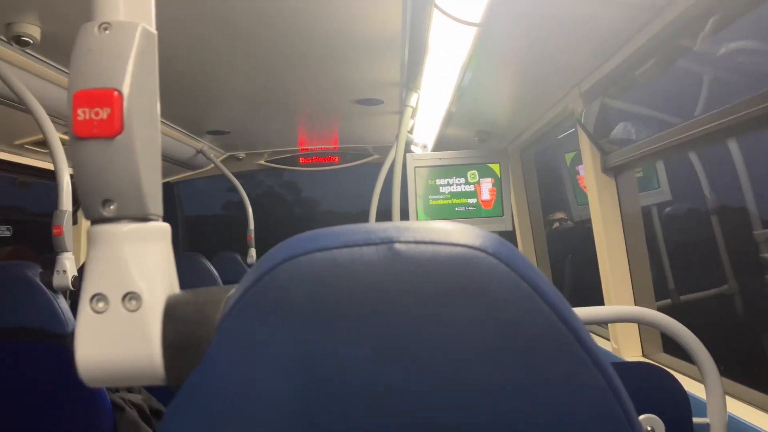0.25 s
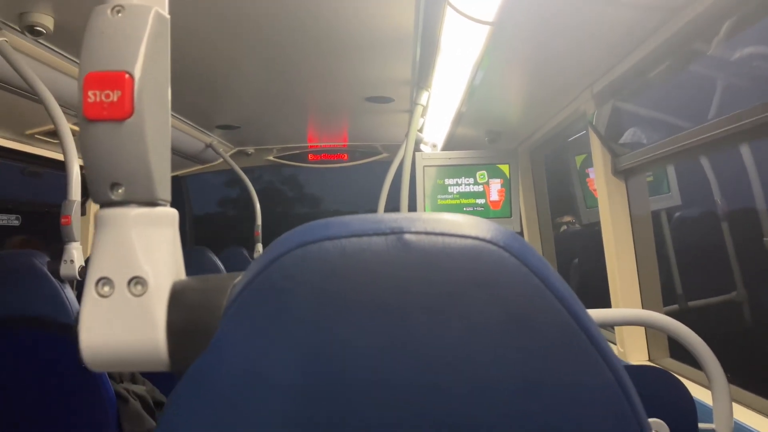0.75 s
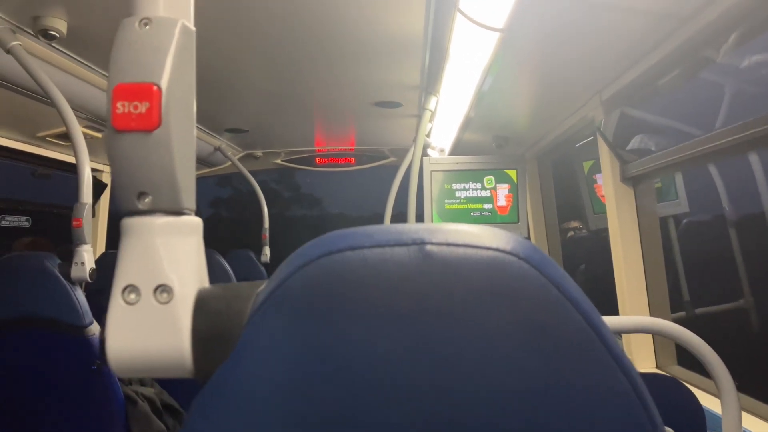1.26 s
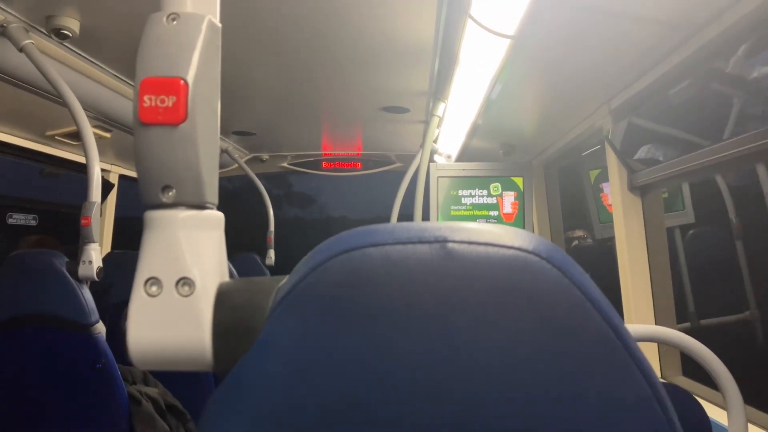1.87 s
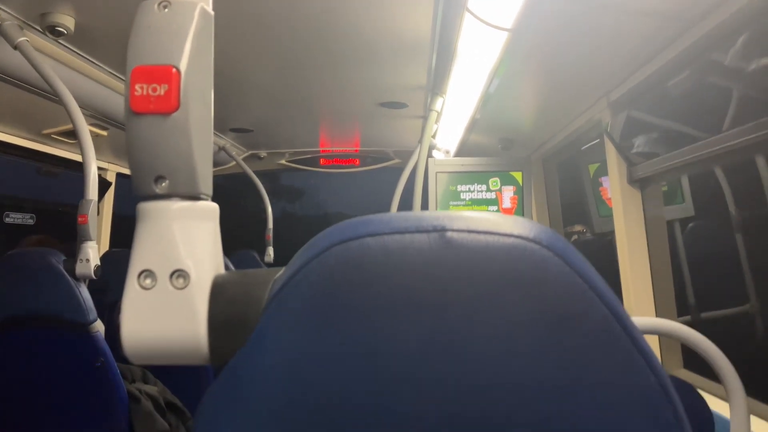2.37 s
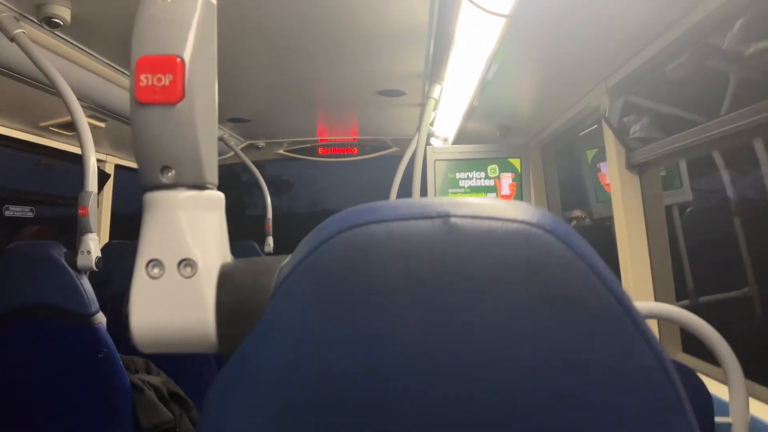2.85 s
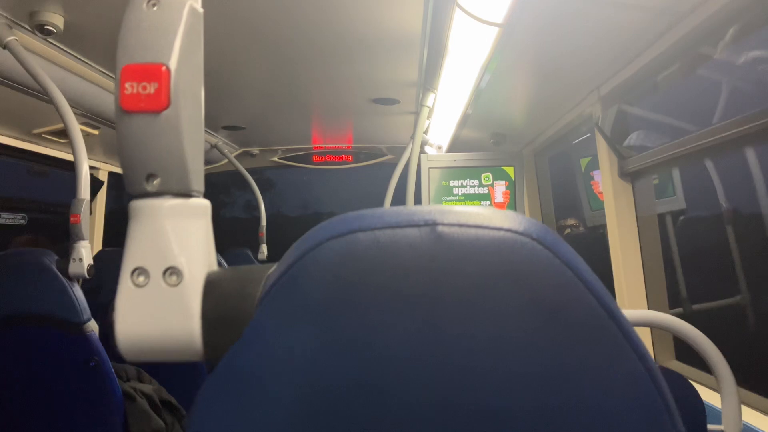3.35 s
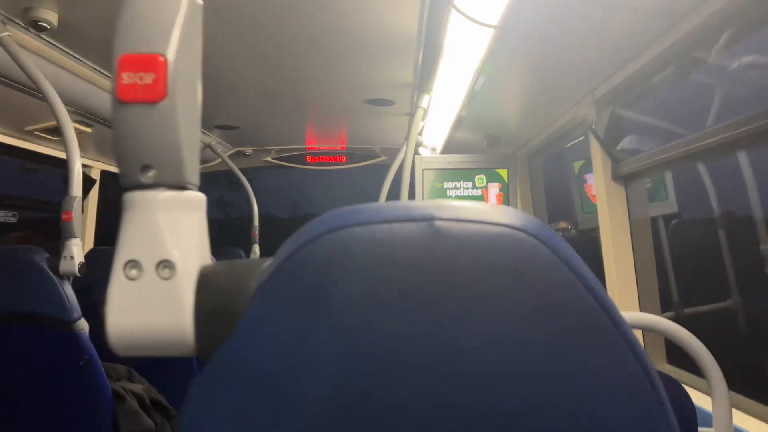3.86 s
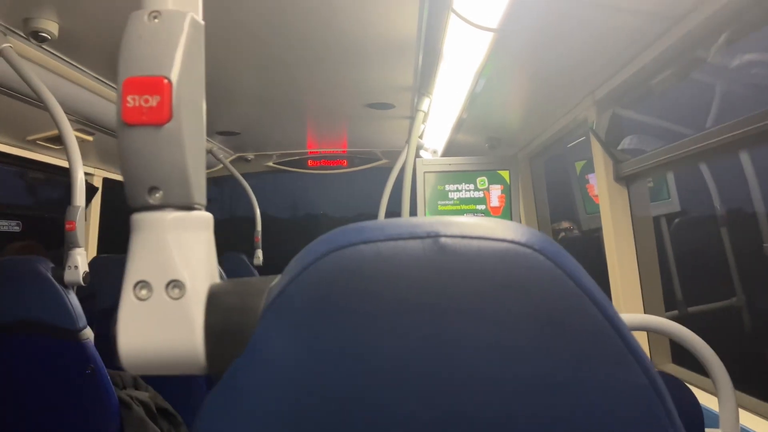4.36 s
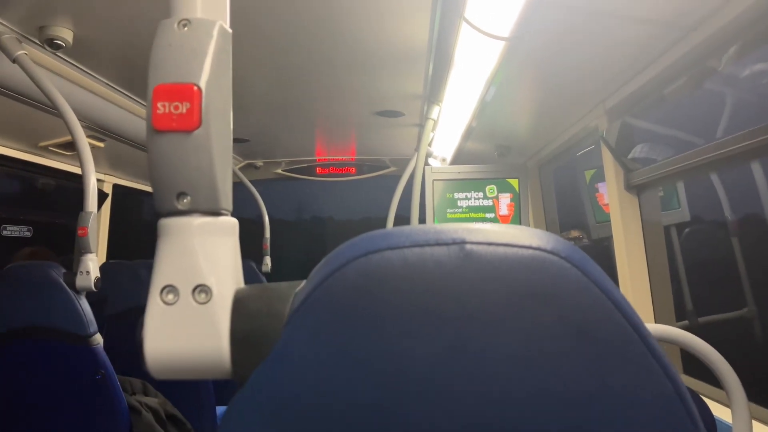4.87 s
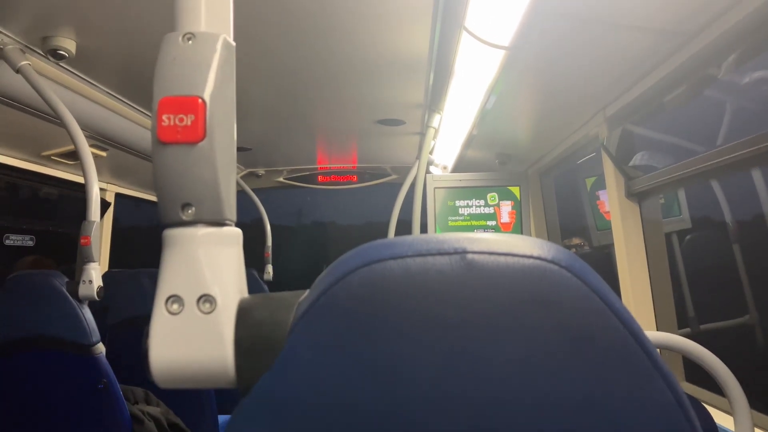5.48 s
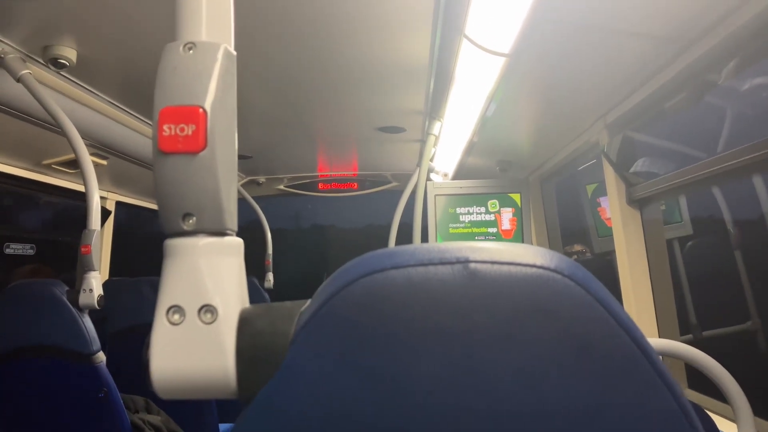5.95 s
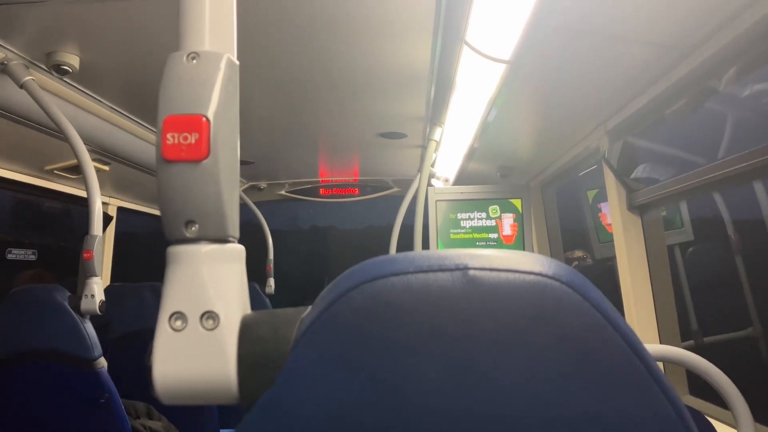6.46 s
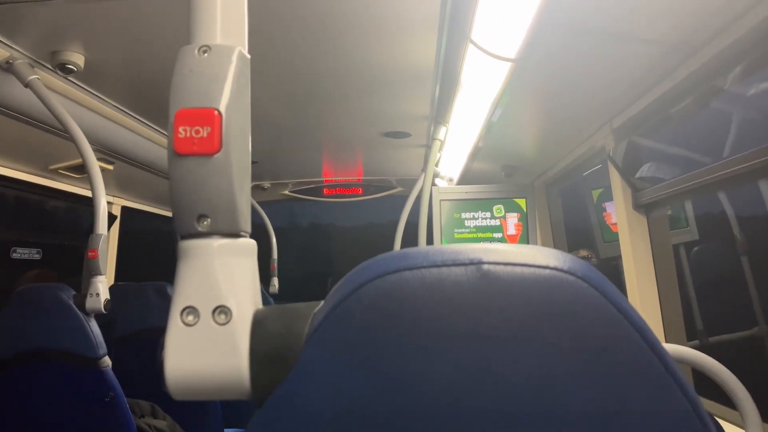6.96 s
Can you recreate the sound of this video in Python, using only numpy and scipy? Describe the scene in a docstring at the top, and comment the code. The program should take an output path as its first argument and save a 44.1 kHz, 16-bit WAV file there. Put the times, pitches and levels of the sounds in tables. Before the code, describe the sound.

Deep, throbbing road rumble and a steady engine hum inside a moving bus, with light trim rattles, dull panel knocks and heavy low thumps near the end.

```python
"""Upper deck of a bus

Inside the cabin of a bus under way, on a phone with two microphone ports.
Shaped noise makes the road rumble; orders of one shaft make the engine hum, which picks up speed once.
Panels sing along as drifting tones. Floor modes swing in low thumps; wall panels knock under short bursts.
Loose trim rattles as a crack, chatter and ringing taps; a high hiss of air swells once."""
import sys
import numpy as np
from scipy import signal
from scipy.fft import rfft, irfft
from scipy.io import wavfile
from scipy.ndimage import uniform_filter1d

SR = 44100
rng = np.random.default_rng(int(sys.argv[2]) if len(sys.argv) > 2 else 0)


def wav_out(sig):
    """Save sig, one row per channel (or a flat mono array), as 16-bit PCM at SR to the path in sys.argv[1]."""
    wavfile.write(sys.argv[1], SR, np.round(np.clip(np.atleast_2d(sig).T, -1, 1) * 32767).astype(np.int16))


N = 318402
T = np.arange(N) / SR


def amp(db):
    """Amplitude ratio of a level in dB."""
    return 10 ** (np.asarray(db) / 20)


def evened(x):
    """Scales to rms 1."""
    return x / np.sqrt(np.mean(x ** 2) + 1e-20)


def read(points, hz):
    """Reads a curve of (frequency_hz, value) along a logarithmic frequency axis."""
    f, value = np.transpose(points)
    return np.interp(np.log(hz + 1), np.log(f + 1), value)


def resonance(hz, centre_hz, width_hz):
    """Bell-shaped peak of height 1; width_hz is the full width at half height."""
    return 1 / (1 + (2 * (hz - centre_hz) / width_hz) ** 2)


def coloured(x, gain):
    """Filters along the last axis by gain(hz)."""
    size = x.shape[-1]
    return irfft(rfft(x) * gain(np.fft.rfftfreq(size, 1 / SR)), size)


def noise(size):
    """Two unrelated channels of white noise."""
    return rng.standard_normal((2, size))


def slow(hz):
    """Random wander up to about hz, rms 1."""
    return evened(coloured(rng.standard_normal(N), lambda f: np.exp(-(f / hz) ** 2)))


def add(mix, start_s, sound):
    """Lays a sound into the mix, cut off at the end."""
    part = mix[:, round(start_s * SR):][:, :sound.shape[1]]
    part += sound[:, :part.shape[1]]


# Road and airflow heard through the body: frequency_hz, density_db (per Hz)
ROAD_COLOUR = [(12, -49), (22, -9), (45, -0.5), (80, 0), (150, -11.5), (210, -14), (290, -21.5),
               (430, -27.5), (800, -28), (1700, -39.5), (2800, -46), (4000, -51), (5500, -59),
               (9000, -64.5), (11500, -72), (13000, -86.5), (15500, -87.5)]
# Resonances of the cabin and panels: frequency_hz, width_hz, gain_db
CABIN_MODES = [(70, 14.7, 4.5), (117, 5.1, 2.5), (162.6, 8, 9.5), (340.5, 60, 5.5), (519, 26, 6.5),
               (591.5, 62, 7.5), (658, 56, 4.5), (930, 3.8, 1.5), (1064, 15, 9), (2057, 38, 6.5)]
# Road under the wheels, against the mean: time_s, rumble_db, treble_db
ROAD_RIDE = [(0, 1.5, 3.5), (0.701, 0.5, 2), (2.1, -3, -0.5), (2.8, 0, 2), (3.6, -2, 0), (4.1, -1, 2.5),
             (4.798, -4, 0.5), (5.599, 1.5, 1), (6.2, 2, 1.5), (6.601, 1.5, 1.5), (7.22, -4, 5.5)]
ROAD_DB = -22.2  # rms level
THROB_DB, THROB_HZ = 2, 9  # the suspension makes the rumble throb at random
# A thump above the threshold lifts the road noise, a softer one dips it: dB per dB, before the shares
JOLT_DB, JOLT_T60_S, JOLT_FROM_DB = 0.94, 0.18, -13.5
JOLT_RUMBLE, JOLT_ROAR, JOLT_TREBLE = 0.35, 0.35, 0.27  # share of the jolt in each band
PATCH_DB = 1.75  # random unevenness over time and frequency


def jolts(t):
    """Dying change of the road noise after each thump, in dB, in proportion to its level."""
    total = 0
    for start_s, peak_db, _ in FLOOR_THUMPS:
        fade = amp(-60 * np.maximum(t - start_s, 0) / JOLT_T60_S)
        total = total + JOLT_DB * (peak_db - JOLT_FROM_DB) * (t > start_s) * fade
    return total


def road():
    """Noise in the cabin resonances; the rumble throbs, and every thump jolts all bands."""
    frames, hz = N // 512 + 5, np.fft.rfftfreq(2048, 1 / SR)
    a, b, c, d, patches = rng.standard_normal((frames, 1025, 5)).T
    patches = uniform_filter1d(patches, size=20, axis=0)  # across frequency
    patches = evened(uniform_filter1d(patches, size=6, axis=1))  # across time

    t = np.arange(frames) * 512 / SR
    time_s, rumble_db, treble_db = np.transpose(ROAD_RIDE)
    jolt = jolts(t)
    throb = THROB_DB * np.interp(t, T, slow(THROB_HZ))
    rumble = np.interp(t, time_s, rumble_db) + throb + JOLT_RUMBLE * jolt
    treble = np.interp(t, time_s, treble_db) + JOLT_TREBLE * jolt

    # rumble below 220 Hz, roar between, treble above 3500 Hz
    low, mid = (1 / (1 + (hz[:, None] / edge_hz) ** 4) for edge_hz in (220, 3500))
    ride = low * rumble + (mid - low) * JOLT_ROAR * jolt + (1 - mid) * treble
    level_db = read(ROAD_COLOUR, hz)[:, None] + ride + PATCH_DB * patches
    spectrum = np.array([a + 1j * b, c + 1j * d]) * amp(level_db)
    roar = signal.istft(spectrum, nperseg=2048, noverlap=1536)[1][:, :N]

    def cabin(f):
        return amp(sum(db * resonance(f, m, w) for m, w, db in CABIN_MODES))

    return amp(ROAD_DB) * evened(coloured(roar, cabin))


# Engine shaft: time_s, speed_hz (turns per s), hum_db
ENGINE_RUN = [(0, 19.15, -40), (.7, 19.13, -38), (1.5, 19.1, -39), (1.7, 19.2, -43), (2.15, 21.1, -43),
              (2.35, 21.75, -30), (3.5, 21.67, -29.5), (4.3, 21.55, -32), (4.6, 21.46, -34.5),
              (5.5, 21.45, -34), (6.4, 21.48, -33.5), (6.95, 21.55, -30), (7.22, 21.55, -30)]
# High orders, level against the hum: multiple (of the shaft speed), level_db, waver_db, wander_rad
HUM = [(10, -14, 1.5, .4), (11, -13, 1.5, .4), (11.5, -20, 2, .4), (12, 0, 1.0, 0.1), (24, -22, 4, 1.8)]
# Low orders, level before the cabin boom: multiple (of the shaft speed), level_db, waver_db, wander_rad
BOOM = [(2.5, -36, 2.5, .5), (3, -33, 2.5, .7), (3.5, -36, 2.5, .5), (4, -31.5, 2.5, .5),
        (4.5, -33, 2.5, .5), (5.5, -36, 2.5, .5), (6, -37, 2.5, .5), (8, -41, 2.5, .5)]
BOOM_HZ, BOOM_WIDTH_HZ, BOOM_DB = 65, 10, 8  # the cabin swells low orders near this pitch


def engine():
    """Wavering orders of one turning shaft: a high hum, and low orders that boom in the cabin."""
    time_s, speed_hz, hum_db = np.transpose(ENGINE_RUN)
    speed_hz = np.interp(T, time_s, speed_hz)
    turns = np.cumsum(speed_hz) / SR

    def order(multiple, db, waver_db, wander_rad):
        level = np.sqrt(2) * amp(db + waver_db * slow(6.8))
        return level * np.sin(2 * np.pi * multiple * turns + wander_rad * slow(3.85))

    hum = amp(np.interp(T, time_s, hum_db)) * sum(order(*row) for row in HUM)
    boom = 0
    for row in BOOM:
        swell_db = BOOM_DB * resonance(row[0] * speed_hz, BOOM_HZ, BOOM_WIDTH_HZ)
        boom = boom + order(*row) * amp(swell_db)
    return hum + boom


# Panels singing along: pitch_hz, level_db, wander_hz
SINGING_PANELS = [(327.7, -44, 9), (373.4, -51, 8), (580, -50, 10), (601.5, -48, 11), (688, -53, 12),
                  (793, -56, 14), (927, -59, 10)]
DRONE_FLUTTER_HZ, DRONE_DRIFT_HZ = 7.6, 1.2  # how fast level flutters and pitch drifts


def drone(pitch_hz, level_db, wander_hz):
    """One narrow, fluttering tone with a drifting pitch."""
    turns = np.cumsum(pitch_hz + wander_hz * slow(DRONE_DRIFT_HZ)) / SR
    return amp(level_db) * slow(DRONE_FLUTTER_HZ) * np.sqrt(2) * np.sin(2 * np.pi * turns)


def drones():
    """Tones whose pitch drifts as the body flexes, drawn separately for each channel."""
    return np.array([sum(drone(*row) for row in SINGING_PANELS) for _ in range(2)])


# Low thumps of two kinds, "front" swells up slowly, "rear" starts at once: start_s, peak_db, kind
FLOOR_THUMPS = [(1.781, -9, "front"), (2.83, -22, "front"), (3.397, -15.5, "front"), (3.858, -7.5, "front"),
                (4.279, -5.5, "rear"), (4.43, -10, "rear"), (5.773, -8.5, "front"), (6.137, -1, "rear"),
                (6.37, -7.5, "rear"), (6.723, -1, "rear")]
# Floor modes of each kind of thump: frequency_hz, level_db, t60_s
FLOOR_MODES = {"front": [(68.7, 0, .2), (140, -15, .3)], "rear": [(48.5, -9.5, .64), (60.4, 0, .33),
               (75.4, -18, 1.2), (96.4, -14, .62)]}
# Rise of each kind of thump: rise_s
THUMP_RISE = {"front": .042, "rear": .004}


def thumps():
    """The floor modes swing a few cycles after each blow and beat against each other."""
    out, t = np.zeros((2, N)), T[:SR]
    for start_s, peak_db, kind in FLOOR_THUMPS:
        rise = 1 - np.exp(-(t / THUMP_RISE[kind]) ** 2)
        modes = FLOOR_MODES[kind]
        swing = rise * sum(amp(g - 60 * t / t60) * np.sin(2 * np.pi * hz * t) for hz, g, t60 in modes)
        add(out, start_s, amp(peak_db) * swing / abs(swing).max() * np.ones((2, 1)))
    return out


# Dull knocks of the wall panels, some close to a thump: start_s, level_db, brightness_db (per octave)
PANEL_KNOCKS = [(0.479, -32.5, 3), (3.80, -22.5, -3.5), (4.201, -25.5, -8), (5.049, -27, 4.5),
                (5.681, -25, -1.5), (6.071, -23, 9.5), (6.099, -21.5, -5), (6.252, -20, -11.5),
                (6.313, -23.5, -7.5), (6.432, -27, -5), (6.66, -22.5, -5), (6.69, -20.5, -10),
                (6.77, -27, -11)]
# Wall panel modes: frequency_hz, level_db, width_hz
PANEL_MODES = [(240, -1, 57), (313, 8, 25), (331.7, 9, 18), (367.5, 3.5, 30), (530, 3.5, 36),
               (589, 6.5, 31), (699, -3.5, 140), (783, -2, 100), (917, -4.5, 90), (1230, -16, 200)]
KNOCK_T60_S, KNOCK_RISE_S = 0.15, 0.0069


def knocks():
    """The wall panels swing at their modes under a dull, uneven burst."""
    out, t = np.zeros((2, N)), T[:SR // 2]
    for start_s, level_db, bright_db in PANEL_KNOCKS:
        # the brightness tilts the modes about 600 Hz
        modes = [(m, amp(g + bright_db * np.log2(m / 600)), w) for m, g, w in PANEL_MODES]
        burst = coloured(noise(len(t)), lambda f: sum(gain * resonance(f, m, w) for m, gain, w in modes))
        swing = 0
        for m, gain, w in modes:
            phase = 2 * np.pi * rng.random((2, 1))
            swing = swing + gain * np.sqrt(w) * np.sin(2 * np.pi * m * t + phase)
        fade = amp(level_db - 60 * t / KNOCK_T60_S) * (1 - np.exp(-t / KNOCK_RISE_S))
        uneven = amp(2.0 * evened(uniform_filter1d(rng.standard_normal(len(t)), size=500)))
        add(out, start_s, evened(evened(burst) + evened(swing)) * fade * uneven)
    return out


# Loose trim: start_s (the whole rattle begins 1 ms earlier), level_db, brightness_db (at 12 kHz),
# rise_s, centre_hz (of the clatter)
TRIM_RATTLES = [(0.754, -45.5, -15, 0.0071, 3500), (.85, -52.5, -11, 0.0085, 2980),
                (2.041, -58, 0, 0.0066, 2970), (2.778, -57.5, -19.5, 0.0044, 3000),
                (2.828, -58.5, -6, 0.0051, 3000), (3.211, -42, 3.5, 0.0008, 2600),
                (3.218, -46, -25, 0.00077, 2900), (3.231, -54, -18, .001, 2200),
                (3.536, -50.5, -27.5, .001, 2300), (3.539, -40.5, -2, 0.02, 2900),
                (3.555, -50.5, -8, .002, 3900), (3.574, -55, -16, .002, 2300),
                (4.187, -42.5, -13, 0.008, 4100), (4.2, -52, -18, .003, 3100),
                (6.10, -46.5, 3.5, 0.033, 4560), (6.17, -48.5, -11, 0.0071, 3580),
                (6.25, -52.5, -1, 0.017, 3470), (6.377, -54, 3, 0.013, 3000),
                (6.665, -50.5, 11, 0.032, 4540), (6.952, -56, 8, 0.0055, 4560),
                (7.133, -50, -8, 0.0025, 3060), (7.163, -57.5, -11, 0.0044, 2970)]
# Colour of the chatter: frequency_hz, density_db (per Hz)
TRIM_COLOUR = [(900, -47.5), (1400, -4), (2400, -5.5), (3300, -2), (4300, -6.5), (5200, -7.5), (6500, -6.5),
               (8000, -7.5), (10500, -10.5), (13000, -19.5), (16000, -29)]
# Modes rung by the taps: frequency_hz, t60_s
TRIM_RINGS = [(1440, .025), (2020, .025), (2375, .035), (2900, .02), (3240, .018), (3850, .02),
              (4100, .025), (4770, .02), (5800, .009), (6500, .01), (7500, .01)]
RATTLE_T60_S, GRAIN_DB = 0.14, 1.8  # decay and unevenness of the chatter
CRACK_DB, CRACK_DB_PER_MS = 5.5, -1.3  # the slower the rise, the weaker the first crack
CRACK_BRIGHT_DB = 11  # the crack is brighter than the chatter, dB at 12 kHz
TAPS_PER_S, CLATTER_OCTAVES, MODE_SPREAD_DB = 600, 0.45, 1.2  # taps favour modes near the centre


def trim_ring(centre_hz):
    """Dying trim modes, strongest near the centre of the clatter, scaled to unit energy."""
    t, ring = T[:4000], 0
    for hz, t60 in TRIM_RINGS:
        near = np.exp(-(np.log2(hz / centre_hz) / CLATTER_OCTAVES) ** 2 / 2)
        fade = amp(MODE_SPREAD_DB * rng.standard_normal() - 60 * t / t60)
        ring = ring + near * fade * np.sin(2 * np.pi * hz * t)
    return ring / np.linalg.norm(ring)


def rattles():
    """A short crack, then hissing chatter and small taps that ring in the trim, dying away in the cabin."""
    out, t = np.zeros((2, N)), T[:SR // 2]
    for start_s, level_db, bright_db, rise_s, centre_hz in TRIM_RATTLES:
        burst = coloured(noise(len(t)), lambda f: amp(read(TRIM_COLOUR, f) + bright_db * f / 12000))
        fade = amp(-60 * t / RATTLE_T60_S) + 0.33 * amp(-25 * t / RATTLE_T60_S)
        shake = (1 - np.exp(-t / rise_s)) * fade
        grain = amp(GRAIN_DB * evened(uniform_filter1d(rng.standard_normal(len(t)), size=60)))
        chatter = evened(burst) * shake * grain

        taps = evened(noise(len(t)) * (rng.random((2, len(t))) < TAPS_PER_S / SR))
        clatter = signal.fftconvolve(taps * shake, trim_ring(centre_hz)[None], axes=1)[:, :len(t)]

        snap = np.exp(-t / 0.0048) * (1 - np.exp(-t / 0.00056))
        bright = evened(coloured(burst, lambda f: amp(CRACK_BRIGHT_DB * f / 12000)))
        crack = bright * snap * amp(CRACK_DB + CRACK_DB_PER_MS * 1000 * rise_s)
        add(out, start_s - .001, (chatter + clatter + crack) * amp(level_db))
    return out


# Colour of the hiss: frequency_hz, density_db (per Hz)
HISS_COLOUR = [(5000, -24.5), (7000, -3.5), (9000, -7.5), (11500, -4), (14000, -19), (16000, -26)]
AIR_PEAK_S, AIR_DB, AIR_RISE_S, AIR_FALL_S = 5.37, -61.5, 0.23, 0.27  # a bell-shaped swell


def air():
    """A smooth, high hiss of shaped noise that swells and fades."""
    hiss = evened(coloured(noise(N), lambda f: amp(read(HISS_COLOUR, f))))
    spread_s = np.where(T < AIR_PEAK_S, AIR_RISE_S, AIR_FALL_S)
    return hiss * amp(AIR_DB) * np.exp(-.5 * ((T - AIR_PEAK_S) / spread_s) ** 2)


def scene():
    """Two samples of the cabin's sound field, sharing the same engine and thumps."""
    return road() + engine() + drones() + thumps() + knocks() + rattles() + air()


# Likeness of the two ports: frequency_hz, likeness (0-1)
PORT_LIKENESS = [(25, 1), (60, 1), (130, 0.81), (270, 1), (450, 0.71), (780, 0.76), (1000, 0.05),
                 (2000, 0.9), (3000, 0), (6000, 0.2), (7200, 1), (9000, 1), (15000, 1)]
# Right port ahead of the left: frequency_hz, lead_rad
PORT_LEAD = [(0, 0), (65, .1), (260, .12), (450, .3), (780, .9), (1700, 2.0), (2100, 1.6), (2800, 0),
             (7000, 6.2), (9100, 9.4), (11000, 12.5), (12500, 13.6), (15700, 17.5)]
# Left port over the right: frequency_hz, tilt_db
PORT_TILT = [(60, -1), (170, 1.5), (500, 2), (1440, 0.5), (4160, -0.5), (12000, 0)]
EDGE_HZ = 15700  # band limit


def record(dry):
    """The right port shares part of the left one's sound, a little earlier; soft clipping, then band limit."""
    hz, (a, b) = np.fft.rfftfreq(N, 1 / SR), rfft(dry)
    same = np.clip(read(PORT_LIKENESS, hz), 0, 1)
    lead = np.exp(1j * np.interp(hz, *np.transpose(PORT_LEAD)))
    right = same * lead * a + np.sqrt(1 - same ** 2) * b
    tilt = amp(read(PORT_TILT, hz) / 2)  # half on each port
    pair = irfft(np.array([a * tilt, right / tilt]), N)
    pair = pair / (1 + (pair / .95) ** 6) ** (1 / 6)
    band = signal.firwin(511, EDGE_HZ, window=("kaiser", 9), fs=SR)
    return signal.oaconvolve(pair, band[None], "same")


dry = scene()
out = record(dry)
wav_out(out)
```